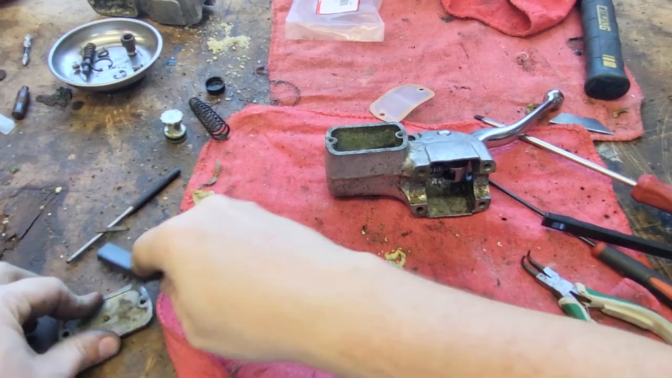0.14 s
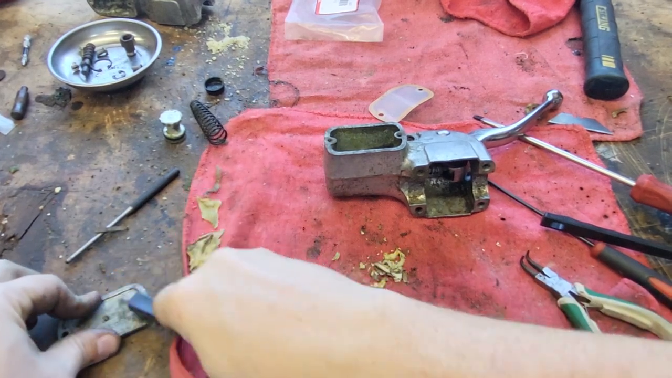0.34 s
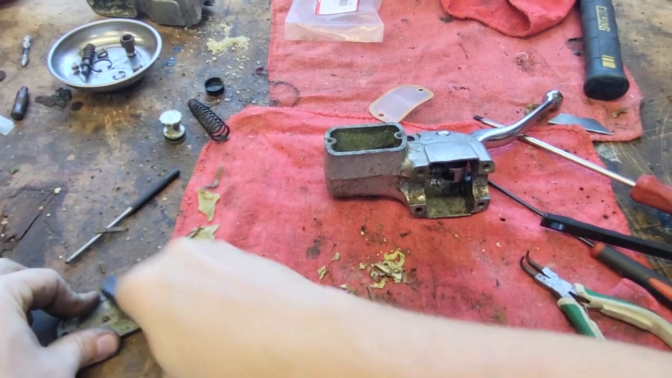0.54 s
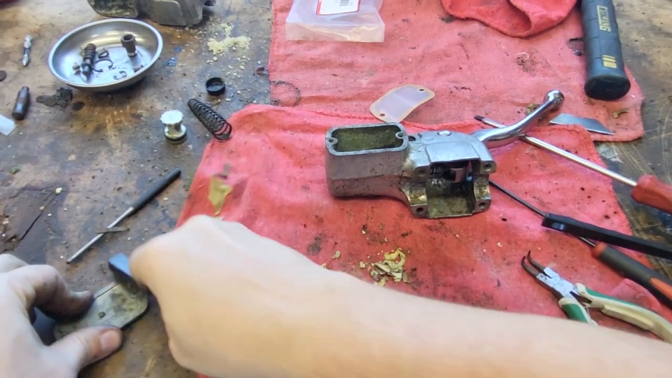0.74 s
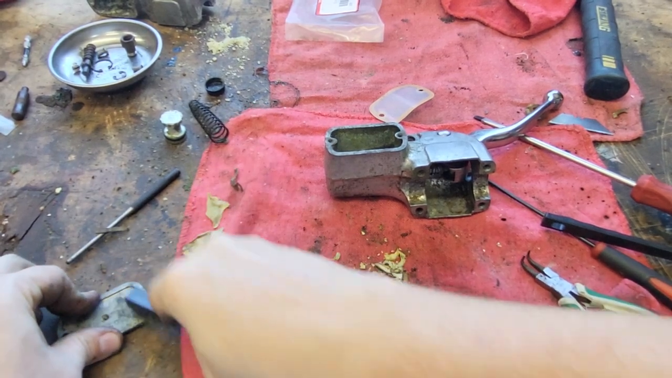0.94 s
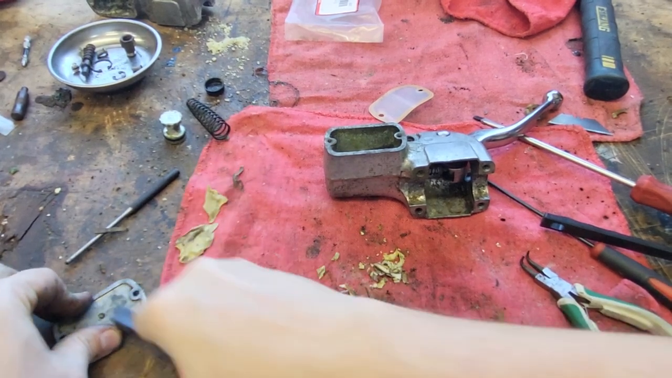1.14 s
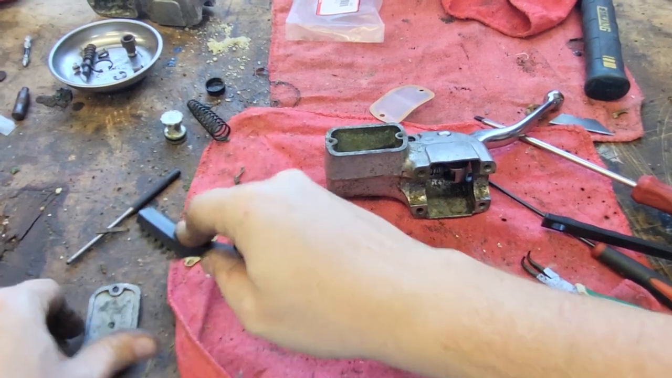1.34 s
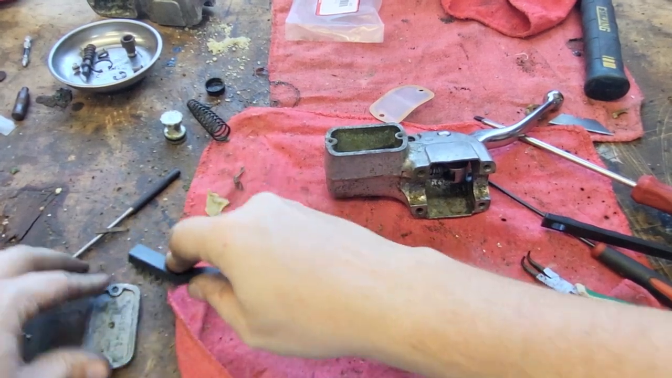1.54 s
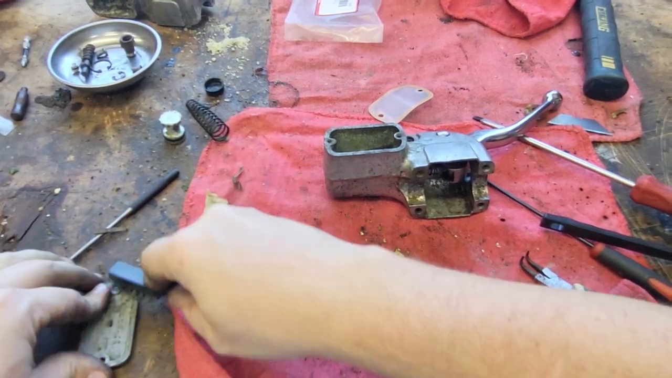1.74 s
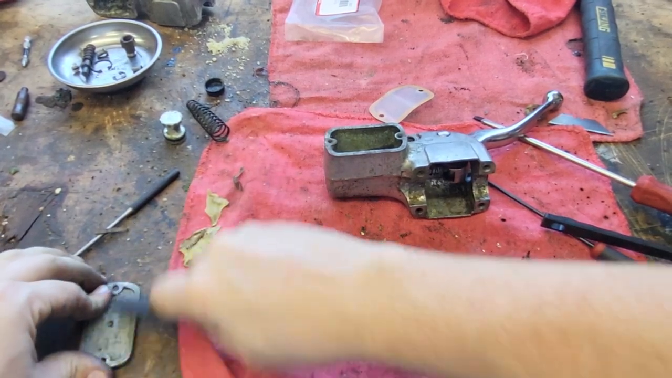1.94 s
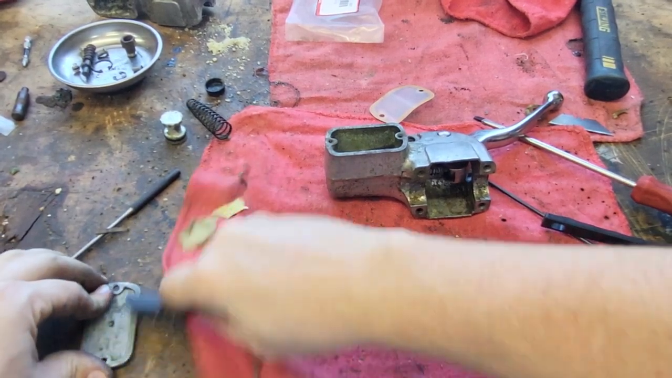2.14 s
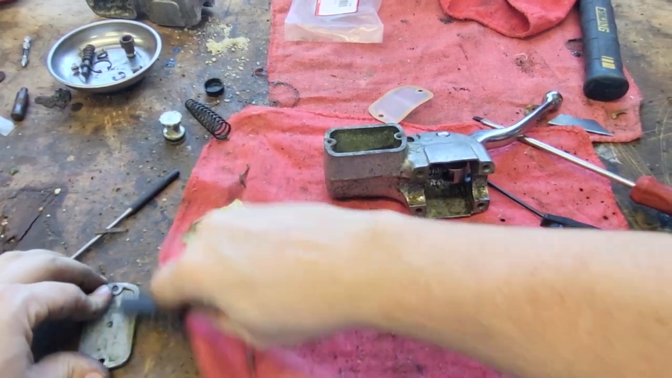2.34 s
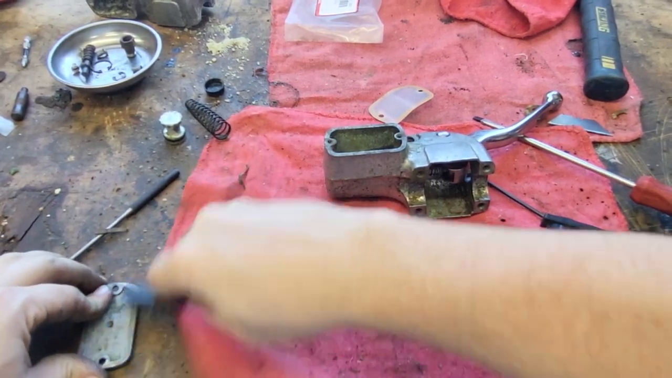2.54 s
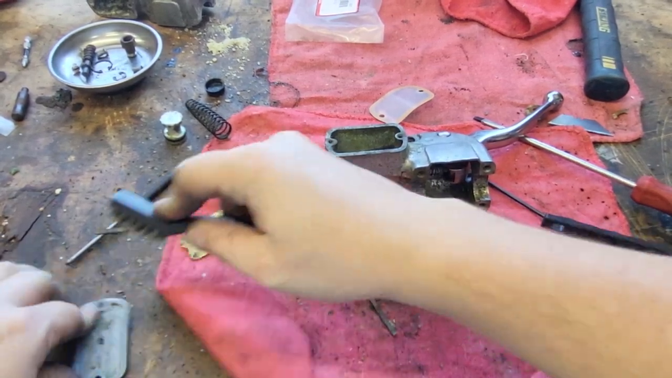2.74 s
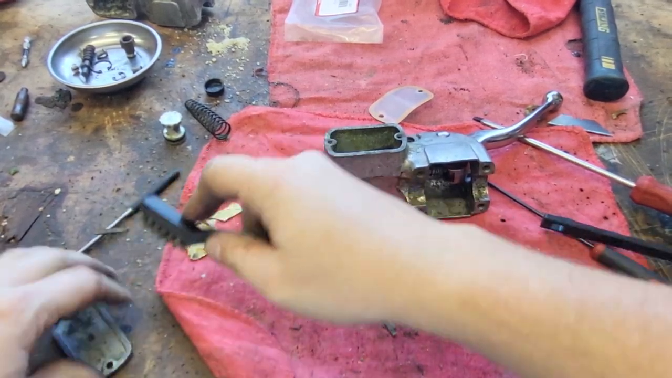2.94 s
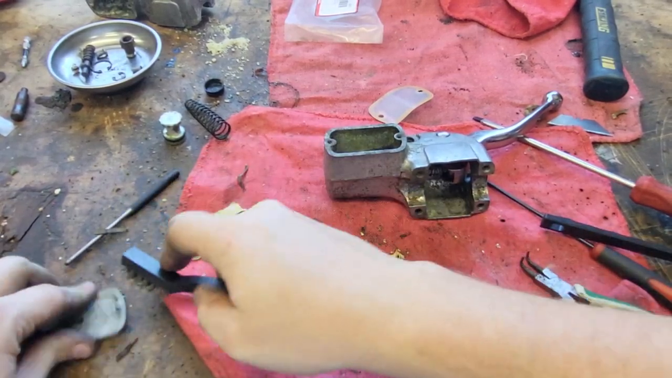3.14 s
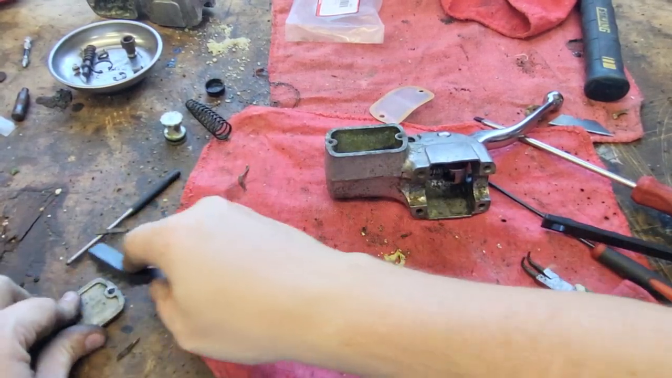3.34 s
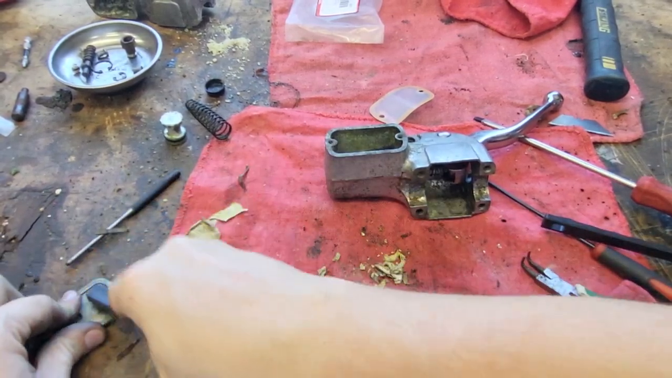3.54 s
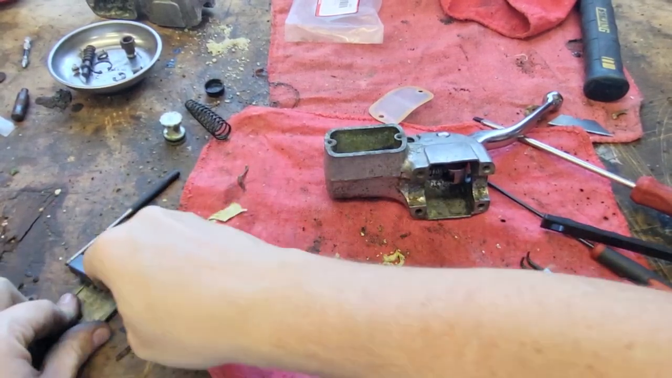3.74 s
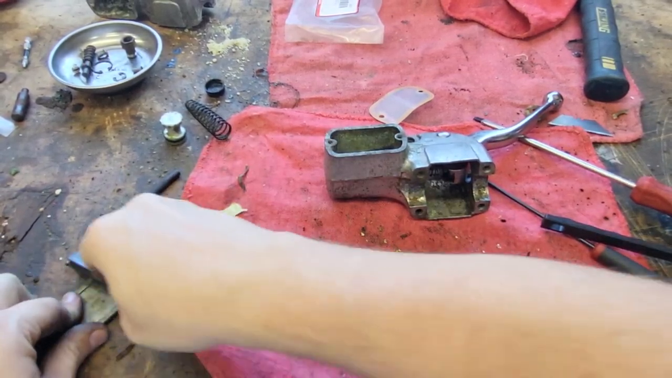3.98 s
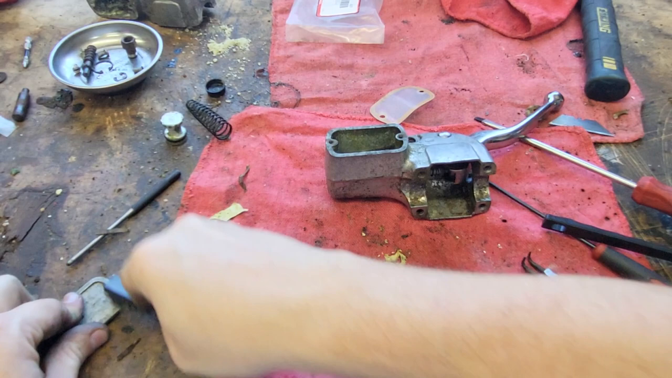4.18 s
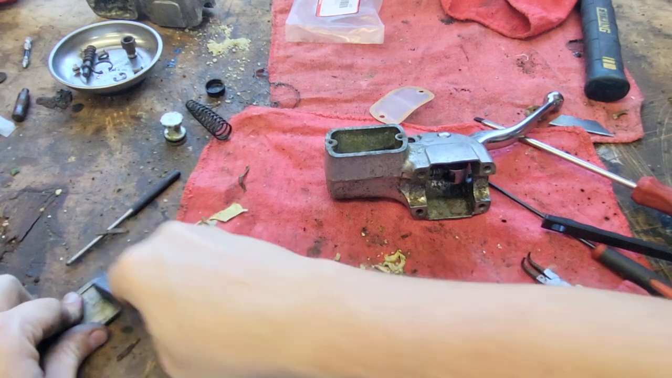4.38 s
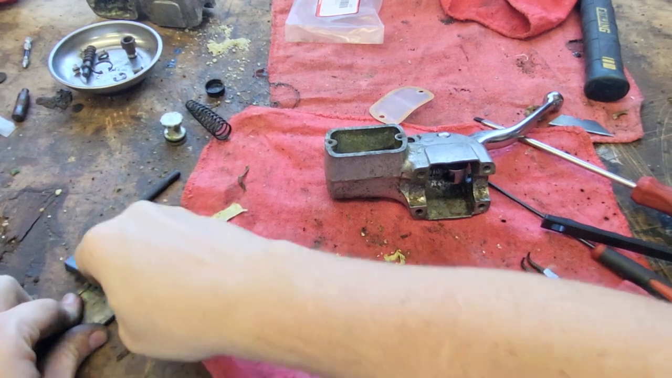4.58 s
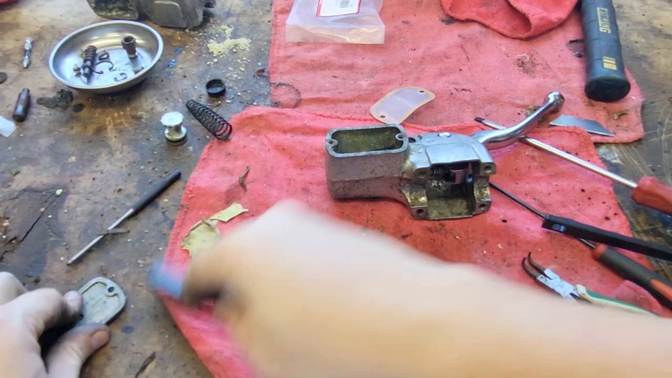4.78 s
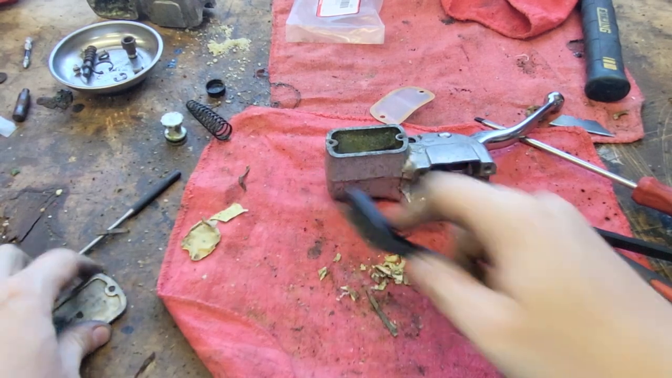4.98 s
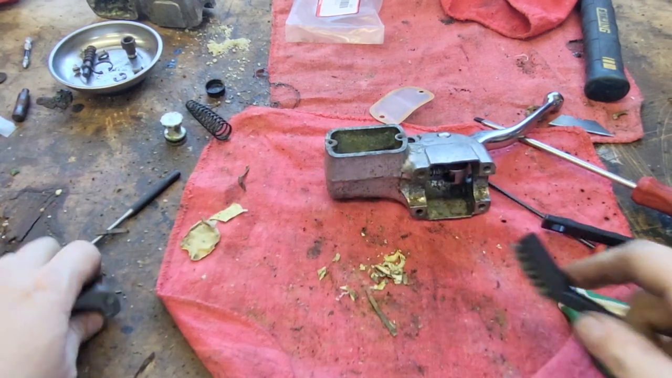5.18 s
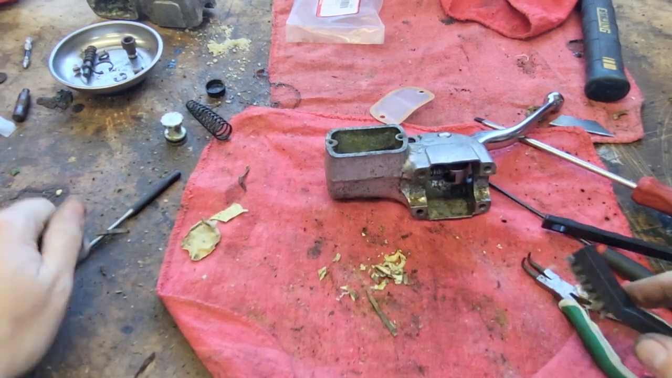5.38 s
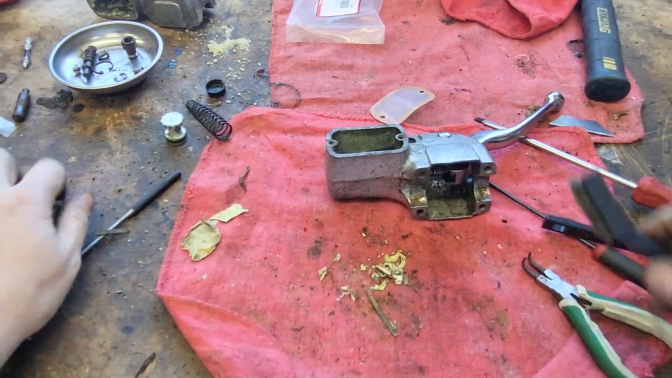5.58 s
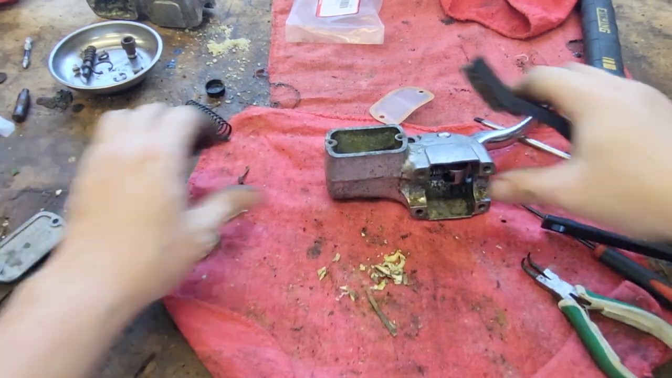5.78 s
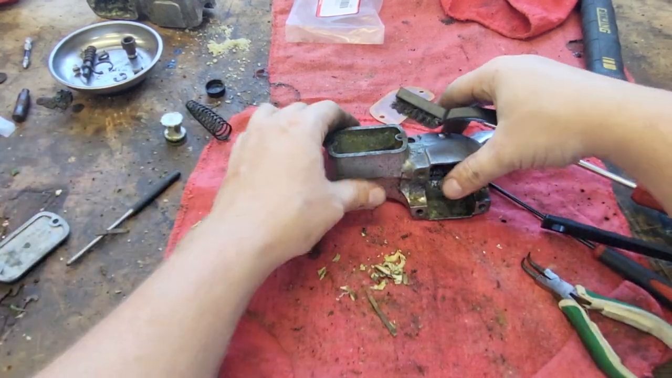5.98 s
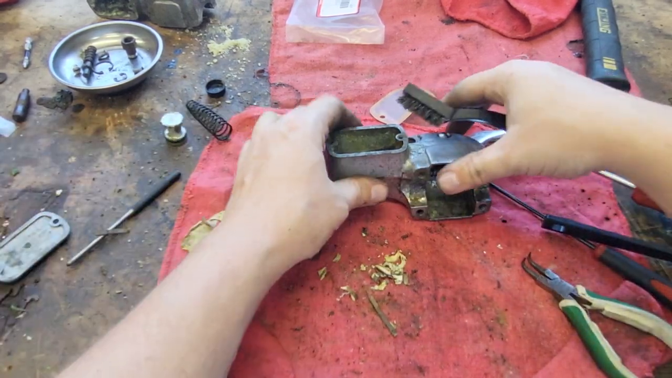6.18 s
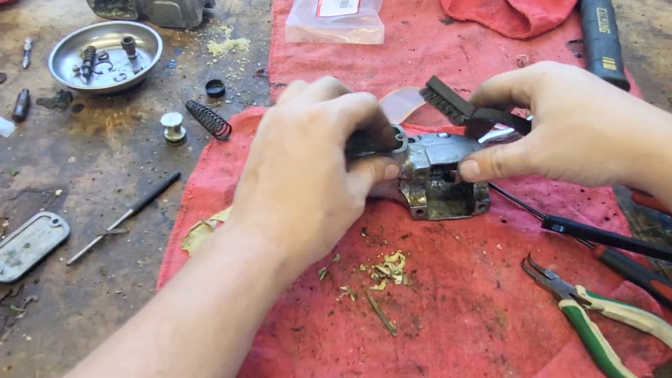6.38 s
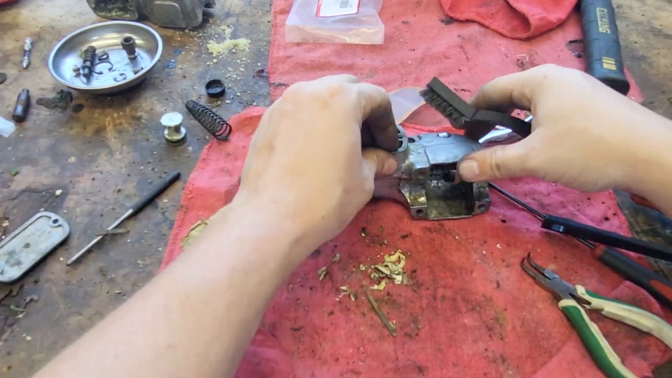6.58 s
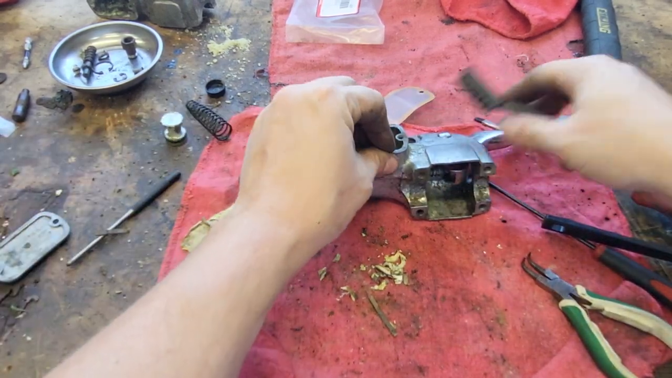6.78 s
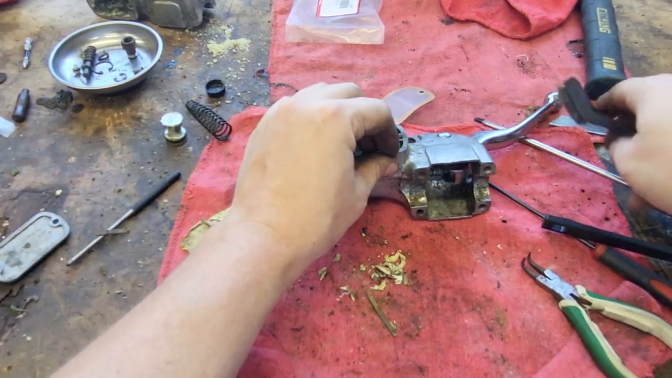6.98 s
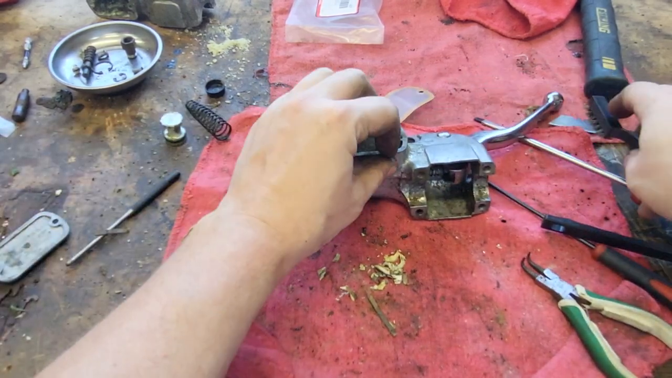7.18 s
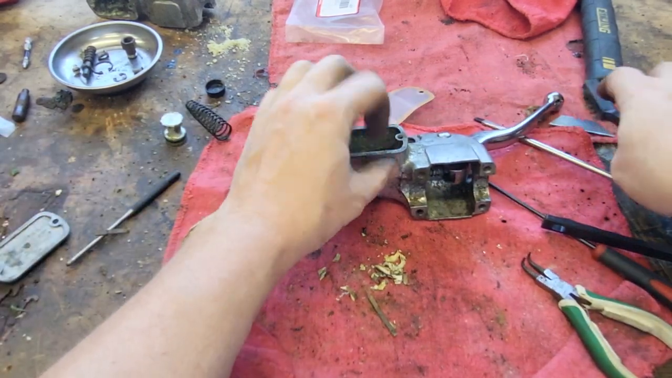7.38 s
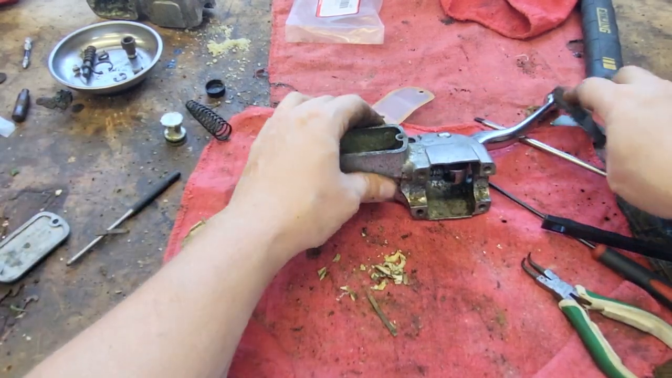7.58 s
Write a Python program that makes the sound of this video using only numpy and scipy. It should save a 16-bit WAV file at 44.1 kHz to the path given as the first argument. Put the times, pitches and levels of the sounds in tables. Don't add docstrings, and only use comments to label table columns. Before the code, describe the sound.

A wire brush scrubs a small metal cover in three quick raspy runs, then the cover drops, clatters on the wooden bench and settles.

```python
import sys
import numpy as np
from scipy import signal
from scipy.fft import rfft, irfft, next_fast_len
from scipy.io import wavfile
from scipy.ndimage import uniform_filter1d

SR = 44100
rng = np.random.default_rng(int(sys.argv[2]) if len(sys.argv) > 2 else 0)


def to_linear_factor(level_db):
    exponent = np.asarray(level_db, float) / 20
    return 10 ** exponent


def wrap_up_sound(samples):
    columns = np.atleast_2d(samples).T
    tamed = np.clip(columns, -1, 1)
    steps = np.round(tamed * 32767).astype(np.int16)
    wavfile.write(sys.argv[1], SR, steps)


N = 336040
TIME = np.arange(N) / SR
SIZE = 2 * next_fast_len((N + 2 ** 15) // 2)
HZ = np.maximum(np.fft.rfftfreq(SIZE, 1 / SR), 1)
PLACES = 4

# (frequency [Hz], level [dB per Hz])
BRISTLE_HISS = [(1470, -34.5), (2500, -13), (2660, -1), (3260, -8.5), (4170, -1.5), (4760, -5),
                (5190, -2.5), (6400, -4), (7250, 1), (8000, -7), (9400, -20.5), (10300, -19.5), (13300, -9),
                (15200, -13.5), (16000, -35.5)]
# (frequency [Hz], width [Hz], level [dB])
BENCH_MODES = [(207, 39, -10.5), (296, 22, -6.5), (474, 83, -3), (592, 80, 2.5), (767, 110, -3.5)]


def unit(response):
    return response / np.sqrt(np.mean(np.abs(response) ** 2))


def each(pair):
    return np.array([unit(one) for one in pair])


def gain_at(points):
    hz, db = np.transpose(points)
    return to_linear_factor(np.interp(np.log(HZ), np.log(np.maximum(hz, 1)), db))


def colour(points):
    cepstrum = irfft(np.log(gain_at(points) + 1e-5), SIZE)
    cepstrum[1:SIZE // 2] *= 2
    cepstrum[SIZE // 2 + 1:] = 0
    return unit(np.exp(rfft(cepstrum)))


def modes(table, spread=1.0, shift=1):
    x = HZ / shift
    lowest_hz, highest_hz = table[0][0], table[-1][0]
    skirts = 1 / (1 + 1j * x / (1.3 * highest_hz)) ** 2 / (1 - 1j * .7 * lowest_hz / x)
    ring = 0
    for k, (hz, width, db) in enumerate(table):
        detuning = (x / hz - hz / x) * hz / (spread * width)
        ring = ring + (-1) ** k * to_linear_factor(db) / (1 + 1j * detuning)
    return unit(skirts * ring)


def through(x, response):
    return irfft(rfft(x, SIZE) * response, SIZE)[..., :N]


def curves(table):
    s, rise_s, fall_s, db, _ = np.transpose(table)[:, :, None]
    t = TIME[::32]
    drop_db = 20 * np.maximum((s - t) / rise_s, (t - s) / fall_s)
    power = to_linear_factor(db - drop_db) ** 2
    return lambda weights: np.interp(TIME, t, np.dot(weights, power))


def ticks(per_s, scatter_db, flicker_db, flicker_hz):
    slips = (rng.random(N) < per_s / SR) * np.sign(rng.random(N) - .5)
    sizes = to_linear_factor(scatter_db * np.minimum(rng.exponential(size=N), 5.0))
    hold = int(SR / flicker_hz)
    grip = uniform_filter1d(np.repeat(rng.standard_normal(N // hold + 1), hold), hold)[:N]
    x = slips * sizes * to_linear_factor(flicker_db * grip)
    return x / x.std()


def bursts(table, attack_s, decay_s):
    out = np.zeros((len(decay_s), N + SR))
    t = np.arange(SR // 8) / SR
    for s, *levels in table:
        at = int(s * SR)
        for row, db, fall in zip(out, levels, decay_s):
            row[at:at + len(t)] += to_linear_factor(db) * (1 - np.exp(-t / attack_s)) * np.exp(-t / fall)
    return out[:, :N]


def wander(per_s):
    hold = int(SR / per_s)
    pick = np.repeat(rng.integers(0, PLACES, N // hold + 1), hold)[:N]
    chosen = 1. * (pick == np.arange(PLACES)[:, None])
    return np.sqrt(np.maximum(uniform_filter1d(chosen, hold), 0))


def alike_bass(pair, corner_hz=450):
    low = 1 / (1 + (HZ / corner_hz) ** 2)
    both = rfft(pair, SIZE)
    return np.array([both[0], np.sqrt(low) * both[0] + np.sqrt(1 - low) * both[1]])


def air():
    # (frequency [Hz], level [dB per Hz])
    hum_hiss = [(12, -27), (20, 3), (182, 0), (367, -11.5), (446, -11), (976, -24), (1810, -18),
                (2080, -23.5), (5850, -23.5), (7310, -16), (8890, -33), (13900, -22.5), (16000, -27.5)]
    noise = irfft(alike_bass(rng.standard_normal((2, N)), 200) * gain_at(hum_hiss), SIZE)[:, :N]
    return to_linear_factor(-72.5) * noise / noise.std()


def pressure(fade_s=.04):
    # (loudest time [s], rise by 20 dB [s], fall by 20 dB [s], thump level [dB], pitch [Hz])
    pushes = [(0.28, .08, .15, -51, 125), (0.54, .15, .2, -54.5, 176), (1.2, .45, .2, -50.5, 150),
              (1.78, .25, .2, -58, 137), (2.45, .15, .15, -57, 160), (2.66, .3, .3, -56, 84),
              (3.55, .3, .3, -54, 165), (4.04, .04, .15, -48, 250), (4.74, .15, .11, -52, 170),
              (5.3, .25, .45, -61, 150), (5.63, .004, .04, -37, 225), (5.7, .011, .3, -46, 270),
              (5.784, .11, .14, -44, 255), (6.448, .11, .16, -51, 110), (6.936, .026, .14, -54.5, 110),
              (7.186, .085, .055, -52, 200), (7.312, .085, .06, -35.5, 180), (7.4, .05, .45, -60, 200),
              (7.556, .016, .12, -42, 122)]
    # (start [s], end [s], level [dB], pitch [Hz])
    leans = [
        (.02, 2.9, -65, 62),
        (3.02, 4.96, -66, 62),
        (5.2, 5.55, -69, 62),
        (.3, 1.28, -62, 170),
        (1.8, 2.85, -67, 170),
        (3.33, 4.75, -63, 180),
        (6.06, 6.45, -53, 92),
    ]
    mix, push_hz = curves(pushes), np.transpose(pushes)[-1]
    power, pitch = mix(np.ones(len(pushes))), mix(push_hz)
    for start, end, db, hz in leans:
        resting = 1. * ((TIME >= start) & (TIME < end))
        lean = to_linear_factor(db) ** 2 * np.maximum(uniform_filter1d(resting, int(fade_s * SR)), 0)
        power, pitch = power + lean, pitch + hz * lean
    return np.sqrt(power), pitch / power


def hands():
    # (time [s], left minus right [dB])
    hands_pan = [
        (0, 0.5),
        (6.0, 1.5),
        (6.1, 12),
        (6.5, 2.5),
        (6.9, -3.5),
        (7.62, -5.5),
    ]
    sides = np.array([[1], [-1]])
    gain, hz = pressure()
    pair = gain * (ticks(300, 2.7, 3.0, 12) + 0.36 * ticks(300, 3.0, 3.0, 20) * sides)
    pair = pair * to_linear_factor(np.interp(TIME, *np.transpose(hands_pan)) / 2 * sides)
    out = 0
    for centre_hz in 52 * 2 ** np.arange(0, 2.6, .4):
        share = np.exp(-(np.log2(hz / centre_hz) / .5) ** 2) + 22 / centre_hz
        lump = unit(modes([(centre_hz, centre_hz / 2.15, 0)]) ** 2)
        out = out + rfft(0.88 * share * pair, SIZE) * lump
    return irfft(out, SIZE)[:, :N]


def slides():
    # (loudest time [s], rise by 20 dB [s], fall by 20 dB [s], bristle level [dB], bench re bristles [dB])
    light_slides = [(0.092, .045, .011, -51, -18), (1.35, .07, .015, -46.5, -14),
                    (1.37, .006, .16, -66, 11), (1.55, .2, .3, -71, 0), (1.65, .03, .55, -65, 4),
                    (1.81, .03, .03, -51, -3), (1.83, .015, .006, -37, -17), (2.755, .07, .11, -47.5, -10),
                    (2.814, .06, .04, -44.5, -12), (2.84, .011, .07, -58, 5), (3.09, .025, .11, -64.5, 0),
                    (3.215, .13, .04, -46.5, -11.5), (3.505, .006, .11, -49, 0),
                    (4.944, .017, .16, -61.5, -11), (5.166, .025, .2, -61.5, 0),
                    (5.206, .04, .02, -54.5, 0), (5.314, .15, .5, -62.5, 2), (6.17, .03, .12, -79, 0),
                    (7.29, .015, .06, -78, 9), (7.478, .006, .9, -78, 4)]
    mix, bench_db = curves(light_slides), np.transpose(light_slides)[-1]
    tips = np.sqrt(mix(np.ones(len(light_slides))))
    cover = to_linear_factor(.2) * tips
    bench = np.sqrt(mix(to_linear_factor(bench_db) ** 2))
    return np.array([tips, cover, bench])


def contact(table, column):
    blows = np.zeros(N)
    for row in table:
        blows[int(row[0] * SR)] = to_linear_factor(row[column])
    return rfft(blows, SIZE)


def chatter(echo=.64):
    chatter_lags = [.00023, .00052, .0012]
    late = np.exp(-2j * np.pi * HZ * np.array(chatter_lags)[:, None])
    return np.prod((late - echo) / (1 - echo * late), axis=0)


def taps():
    # (time [s], tick [dB], crack [dB], cover [dB], bench [dB])
    light_taps = [(0.081, -44, -58, -58, -70), (0.089, -27, -46, -51, -70), (0.2096, -43, -48, -58, -72),
                  (0.253, -35.5, -40, -51.5, -53), (0.2688, -33.5, -41, -48.5, -51.5),
                  (1.6262, -57, -63, -67, -70), (1.7945, -28, -36, -59, -52), (2.789, -30, -45, -46, -62),
                  (2.796, -35, -46, -34, -52), (2.8091, -33, -47, -47, -52.5),
                  (3.046, -56, -62, -51, -57.5), (3.0865, -43.5, -64, -51.5, -53),
                  (3.1428, -39, -48, -60, -68), (3.1634, -39, -54, -56, -60), (3.3669, -44, -50, -27, -37),
                  (3.381, -60, -62, -40, -46), (3.398, -64, -64, -42, -50), (3.49, -33, -53, -51, -44),
                  (3.4997, -37, -48, -53, -53), (4.026, -50, -55, -48, -38),
                  (5.1501, -45.5, -65, -48.5, -58), (5.2013, -52.5, -51.5, -41, -48),
                  (5.4063, -50, -65, -67.5, -71.5), (6.9232, -76, -88, -84, -70),
                  (7.1707, -68, -84, -86, -74), (7.2887, -58, -72, -72, -58), (7.481, -74, -63.5, -73, -74)]
    # (time [s], tick [dB], crack [dB], cover [dB], bench [dB])
    bounces = [(5.6249, -33.5, -26, -16, -27), (5.6298, -44, -36, -19, -30),
               (5.659, -29.5, -24, -36.5, -38.5), (5.6882, -35, -17, -13.5, -21.5),
               (5.6925, -44, -30, -17, -26), (5.6965, -34, -33, -21.5, -29.5), (5.7045, -50, -38, -21, -31),
               (5.712, -52, -40, -24, -33), (5.729, -52, -42, -25, -35), (5.742, -52, -42, -26, -36),
               (5.7198, -49, -42, -23.5, -34), (5.7554, -39, -33, -33, -42), (5.7662, -42, -32.5, -26, -37),
               (5.7815, -50, -44, -32, -46), (5.8031, -48, -45, -33.5, -47), (5.835, -56, -52, -38, -50),
               (5.859, -60, -54, -39, -52), (5.885, -64, -58, -46, -57)]
    # (frequency [Hz], level [dB per Hz])
    knock = [(300, -42), (800, -6.5), (1100, -0.5), (1600, -0.5), (2400, -3.5), (3300, -11), (5000, -26.5),
             (9000, -50.5)]
    # (frequency [Hz], width [Hz], level [dB])
    tapped_modes = [(1249, 170, 0), (1570, 220, -5), (1895, 200, -8), (2223, 220, -8), (2800, 450, -13),
                    (3830, 900, -26)]
    contacts = light_taps + bounces
    clicks = bursts([row[:2] + row[4:] for row in contacts], 0.00014, [0.0016, .004])
    tick, thud = rfft(clicks * np.sign(rng.standard_normal((2, N))), SIZE)
    edge = 1j * HZ / 4000
    bright = unit(colour(BRISTLE_HISS) * (edge / (1 + edge)) ** 3)
    lag = np.exp(-2j * np.pi * HZ * .0022)
    dropped = to_linear_factor(22.5) * contact(bounces, column=3) * colour(knock)
    crack = to_linear_factor(16.5) * contact(contacts, column=2) * modes([(4300, 2300, 0)])
    tapped = to_linear_factor(21.5) * contact(light_taps, column=3) * modes(tapped_modes) * lag
    blows = (dropped - crack + tapped) * chatter()
    bench = to_linear_factor(7.5) * thud * modes(BENCH_MODES, 2.3)
    out = irfft(to_linear_factor(-1.5) * tick * bright + blows + bench, SIZE)[:N]
    return rfft(wander(6) * (out + pings() + scuffs()), SIZE)


def strokes(flat=1.67):
    # (start [s], length [s], bristle level [dB], rise over the stroke [dB], cover re its grip [dB])
    brush_strokes = [(0.27, 0.157, -33, 0.5, -1), (0.42, 0.15, -32.5, 0.5, -1.5),
                     (0.564, 0.15, -32.5, -3.6, 0), (0.71, 0.081, -33.5, 4.5, 0),
                     (0.787, 0.054, -33.5, -6, 0), (0.844, 0.14, -32.5, 9, 0), (0.994, 0.12, -32.5, 3.5, 0),
                     (1.116, 0.13, -32, -0.5, 0), (1.821, 0.14, -37.5, -2, 0), (1.95, 0.13, -38.5, 8, 0),
                     (2.062, 0.094, -36, -6.5, 0), (2.153, 0.1, -35.5, 2, 0), (2.247, 0.11, -35.5, -5.3, 0),
                     (2.367, 0.092, -36, 6.5, 0), (2.443, 0.11, -38, 0.5, 0), (2.542, 0.1, -34.5, 8.5, 0),
                     (3.533, 0.128, -37, -1.5, 0), (3.66, 0.087, -35.5, 11.5, 0),
                     (3.74, 0.073, -39.5, -9.5, 0), (3.819, 0.11, -35, -2, 0), (3.935, 0.14, -34.5, 2.5, 0),
                     (4.076, 0.152, -33, -1.7, -1.5), (4.233, 0.15, -35.5, -7.5, 0),
                     (4.386, 0.12, -31, 1, 0), (4.509, 0.14, -32.5, 2.2, 0), (4.652, 0.095, -33, 1, 0)]
    # (start [s], cover re bristles [dB], bench re bristles [dB])
    grips = [
        (0, -2.5, -17.5),
        (1.5, -2.1, -15.5),
        (3.3, 0.1, -13),
    ]
    out = np.zeros((3, N))
    for s, length, db, rise_db, ring_db in brush_strokes:
        _, cover_db, bench_db = [grip for grip in grips if grip[0] <= s][-1]
        at, along = int(s * SR), np.linspace(0, 1, int(length * SR))
        speed = np.tanh(2.28 * np.abs(np.sin(np.pi * along)) ** flat)
        parts_db = np.array([[0], [cover_db + ring_db], [bench_db]])
        out[:, at:at + len(along)] += speed * to_linear_factor(db + rise_db * (along - .5) + parts_db)
    return out


def brush():
    # (time [s], bristle level [dB], cover level [dB])
    catches = [(0.4449, -27, -32), (0.465, -26, -32), (0.5926, -30, -31), (0.7328, -29, -34),
               (1.1463, -29, -34), (1.8492, -34, -38), (1.977, -35, -38), (2.1755, -33, -38),
               (2.2688, -30, -36), (2.3885, -33, -38), (2.4658, -32, -38), (2.5641, -33, -38),
               (3.7313, -27, -33), (3.8331, -34, -38), (3.9603, -31, -35), (4.2471, -30, -34),
               (4.4013, -31, -35), (4.525, -32, -36), (0.7677, -20, -39), (0.8151, -17.5, -18.5),
               (0.928, -19.5, -28), (1.0857, -21.5, -24), (1.2294, -20.5, -27), (1.3453, -35, -35.5),
               (1.9194, -32, -37), (2.043, -26, -29), (2.0872, -22.5, -30), (2.3194, -26.5, -30),
               (2.4903, -20, -39), (2.598, -24, -44.5), (3.5497, -27, -31), (3.578, -29, -28),
               (3.7738, -22.5, -29), (4.0003, -22, -30.5), (4.024, -25, -32), (4.1114, -27.5, -34),
               (4.2807, -14, -33.5), (4.2921, -21.5, -29), (4.3307, -26, -26.5), (4.426, -28, -31),
               (4.548, -26, -31), (4.6094, -24, -27.5), (4.7478, -24.5, -37.5)]
    # (frequency [Hz], width [Hz], level [dB])
    cover_modes = [(1079, 120, -8.5), (1276, 80, -1.5), (1585, 70, 0), (2180, 161, 1), (2650, 140, -1),
                   (3294, 65, -9)]
    jolts = [(*row, -43) for row in catches]
    drive = np.hypot(strokes() + slides(), bursts(jolts, 0.0014, [.004, .006, .012]))
    slips = [ticks(10000, 3.3, 1.2, 250), ticks(16000, 2.5, 1.8, 150),
             ticks(6000, 3.04, 1.5, 80), ticks(2000, 2.2, 1.6, 30)]
    drive = drive[[0, 0, 1, 2]] * slips
    hiss, out = colour(BRISTLE_HISS), []
    fine = 1 / (1 + (9800 / HZ) ** 12)
    for share, shift in zip(wander(35), 1 + .07 * rng.uniform(-1, 1, PLACES)):
        tips, points, tufts, rocking = rfft(share * drive, SIZE)
        scrub = (tips * np.sqrt(1 - fine) + points * np.sqrt(fine)) * hiss
        cover = to_linear_factor(-.8) * tufts * modes(cover_modes, 2.6, shift)
        bench = to_linear_factor(-1.2) * rocking * modes(BENCH_MODES, 1.3, shift)
        out.append(scrub + cover + bench)
    return np.array(out)


def squeaks(waver_hz=60):
    # (start [s], length [s], from [Hz], to [Hz], level [dB])
    glides = [(1.475, .07, 8250, 8200, -82), (1.53, .08, 8300, 8750, -88), (1.55, .07, 2380, 2460, -81),
              (1.73, .06, 8550, 8000, -87), (5.33, .1, 2600, 3000, -80), (5.43, .06, 10900, 11500, -88),
              (5.49, .06, 11400, 10700, -86), (3.42, .07, 9500, 10400, -92), (5.27, .16, 6650, 6560, -74),
              (5.24, .17, 9000, 9950, -86), (5.45, .12, 6480, 5850, -75), (5.46, .14, 4500, 4000, -80)]
    out, waver = np.zeros(N), uniform_filter1d(rng.standard_normal(N), SR // 200)
    waver = waver_hz * waver / waver.std()
    for s, length, from_hz, to_hz, db in glides:
        at, along = int(s * SR), np.linspace(0, 1, int(length * SR))
        hz = from_hz + (to_hz - from_hz) * along + waver[at:at + len(along)]
        swell = 2 * np.sqrt(np.abs(np.sin(np.pi * along)))
        out[at:at + len(along)] += to_linear_factor(db) * swell * np.sin(2 * np.pi * np.cumsum(hz) / SR)
    grip = uniform_filter1d(rng.standard_normal(N), SR // 60)
    return out * to_linear_factor(3.0 * grip / grip.std() - 1.5)


def pings():
    # (time [s], frequency [Hz], level [dB], decay by 60 dB [s])
    free_rings = [(3.143, 1870, -40, .04), (3.164, 1850, -36, .04), (3.369, 6700, -60, .12),
                  (3.143, 11700, -52, 0.12), (5.175, 4600, -58.5, 0.14), (5.196, 4600, -47, 0.057),
                  (5.626, 4592, -31.5, 0.19), (5.626, 9300, -50.5, .06), (5.626, 11700, -52, 0.088),
                  (5.626, 13500, -47.5, 0.065), (5.662, 6650, -41.5, .1), (5.768, 6650, -42, 0.07),
                  (5.803, 6100, -51, .05), (5.165, 11800, -70, .08), (5.18, 13300, -66, .05),
                  (5.195, 13300, -67, .05), (5.7, 11700, -56, .1), (5.835, 13400, -65, .07),
                  (5.845, 6650, -60, .08)]
    out, t = np.zeros(N), np.arange(SR // 4) / SR
    for s, hz, db, t60 in free_rings:
        at = int(s * SR)
        out[at:at + len(t)] += to_linear_factor(db) * np.sin(2 * np.pi * hz * t) * np.exp(-np.log(1000) * t / t60)
    return out


def scuffs():
    # (start [s], length [s], frequency [Hz], width [Hz], level [dB])
    rubs = [(6.508, 0.034, 550, 300, -64.5), (6.535, 0.022, 844, 299, -70),
            (6.923, 0.15, 1700, 119.9, -76.5), (7.288, .03, 1600, 450, -62), (6.425, .018, 2400, 300, -84),
            (6.428, .012, 4200, 600, -80), (6.517, .035, 2350, 300, -78), (6.648, .025, 2370, 300, -76),
            (6.922, .014, 2300, 400, -72), (7.168, .016, 2300, 350, -77), (7.304, .02, 1950, 800, -60),
            (7.315, .05, 1400, 260, -72), (7.015, .15, 3450, 500, -88), (7.537, 0.13, 1386, 250, -77.5),
            (7.552, 0.11, 2220, 199, -81), (6.15, 0.31, 600, 300, -74.5)]
    out, grit = np.zeros(N + SR), ticks(3700, 2.2, 1.8, 69)
    for s, length, hz, width, db in rubs:
        at = int(s * SR)
        along = np.arange(int(length * SR) + SR // 50) / (length * SR)
        swell = np.abs(np.sin(np.pi * np.minimum(along, 1) ** 0.43))
        rub = swell * np.resize(grit[at:], len(along))
        band = signal.butter(2, [hz - width / 2, hz + width / 2], "bandpass", fs=SR, output="sos")
        out[at:at + len(along)] += to_linear_factor(db) * np.sqrt(SR / 2 / width) * signal.sosfilt(band, rub)
    return out[:N]


def near():
    t = np.arange(int(.03 * SR)) / SR
    early = (rng.random((2, len(t))) < .1) * rng.standard_normal((2, len(t))) * np.exp(-t / .003)
    lag_s = np.array([[0], [.00023 + .00005 * rng.standard_normal()]])
    return np.exp(-2j * np.pi * HZ * lag_s) + to_linear_factor(0.5) * each(alike_bass(early, 500))


def room():
    # (frequency [Hz], decay by 60 dB [s])
    room_decay = [(100, .6), (500, .5), (2000, 0.44), (6000, .44), (14000, 0.34)]
    t = np.arange(2 ** 15) / SR
    hz, t60 = np.transpose(room_decay)
    noise = rfft(rng.standard_normal((2, len(t))))
    bins, tail = np.fft.rfftfreq(len(t), 1 / SR) + 1, 0
    for centre_hz in 65.0 * 2 ** np.arange(9):
        octave = np.cos(np.pi / 2 * np.clip(np.log2(bins / centre_hz), -1, 1)) ** 2
        decay_s = np.interp(np.log(centre_hz), np.log(hz), t60)
        tail = tail + irfft(noise * octave) * np.exp(-np.log(1000) * t / decay_s)
    return to_linear_factor(-5.7) * each(alike_bass(tail * np.minimum(t / 0.007, 1)))


def scene():
    places = to_linear_factor(-2.5) * (brush() + taps())
    heard = sum(one * near() for one in places) + places.sum(axis=0) * room()
    return irfft(heard, SIZE)[:, :N] + hands() + air() + squeaks()


def band_limit(x):
    return signal.sosfilt(signal.butter(12, 16810, fs=SR, output="sos"), x)


def record(dry):
    # (frequency [Hz], left minus right [dB])
    left_tilt = [(40, 7), (100, 5.5), (200, 2.5), (400, .1), (700, 2.2), (1300, 1.2), (2000, 1),
                 (4000, -4.5), (8000, .3), (15000, -1.8)]
    tilt = np.sqrt(gain_at(left_tilt))
    top = 1 / (1 + (HZ / 15950) ** 120)
    rounded = np.tanh(1.1 * dry) / 1.1
    mix = through(rounded, top * np.array([tilt, 1 / tilt]))
    return band_limit(mix)


dry = scene()
out = record(dry)
wrap_up_sound(out)
```